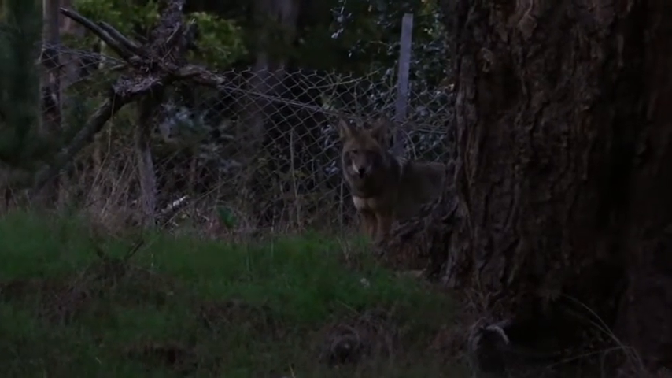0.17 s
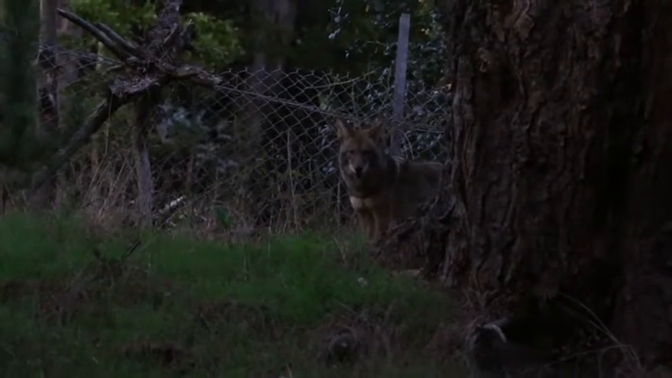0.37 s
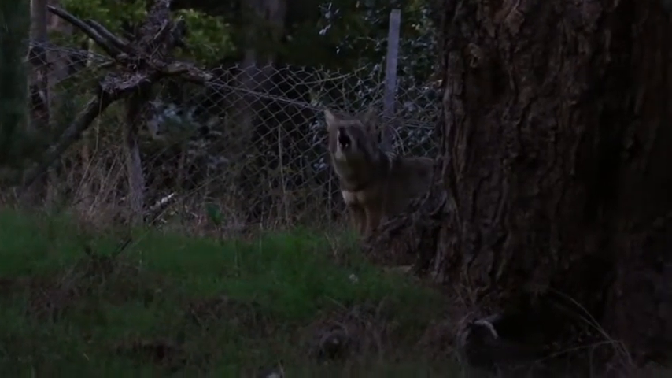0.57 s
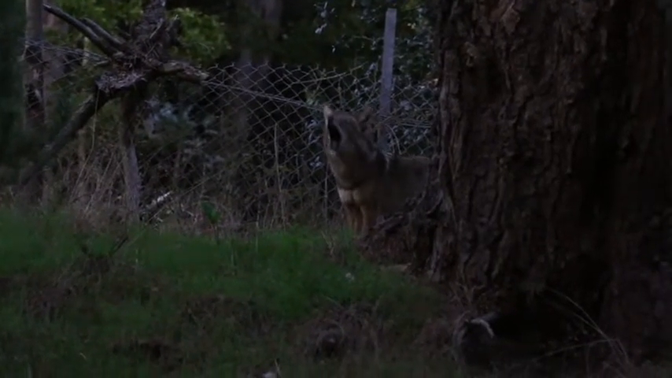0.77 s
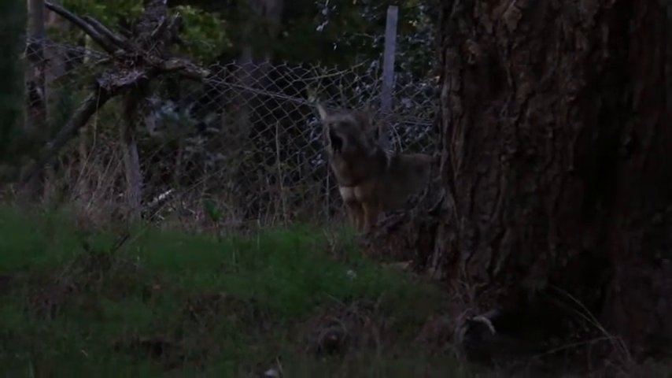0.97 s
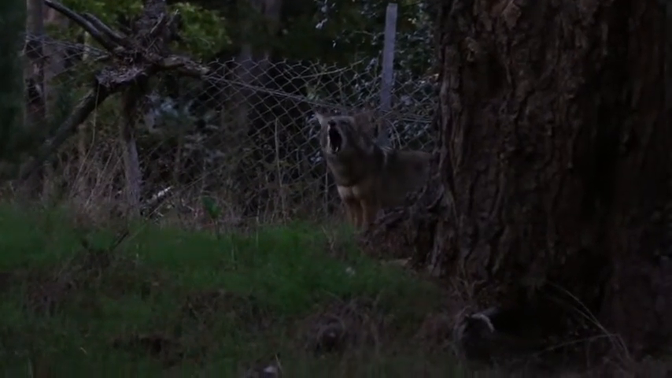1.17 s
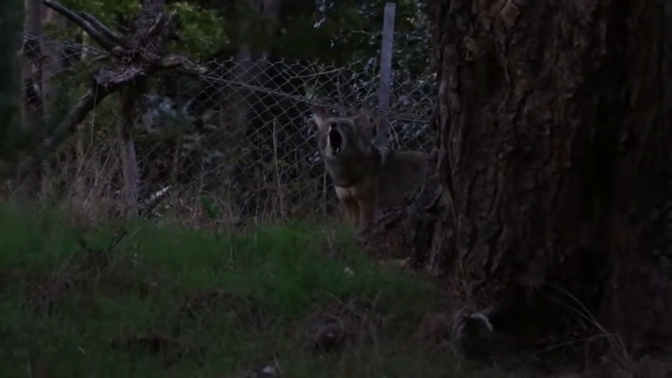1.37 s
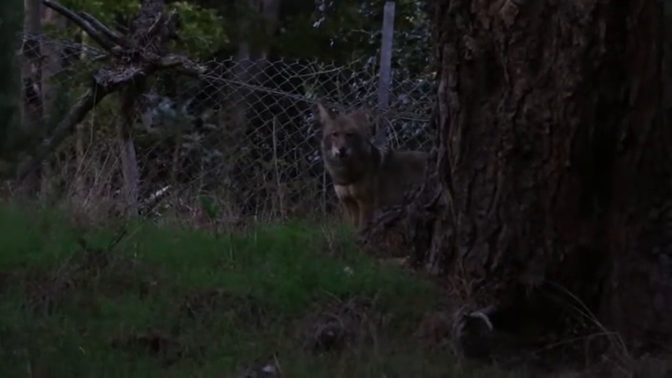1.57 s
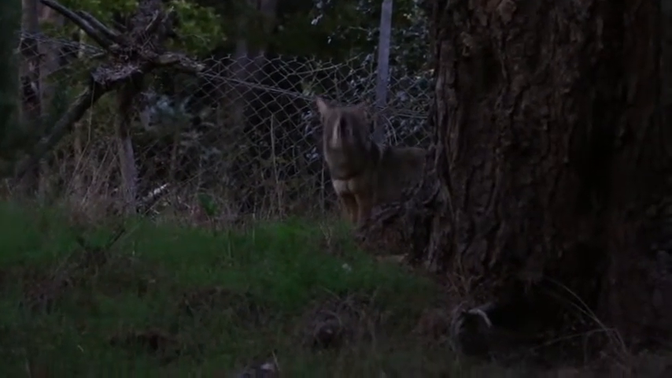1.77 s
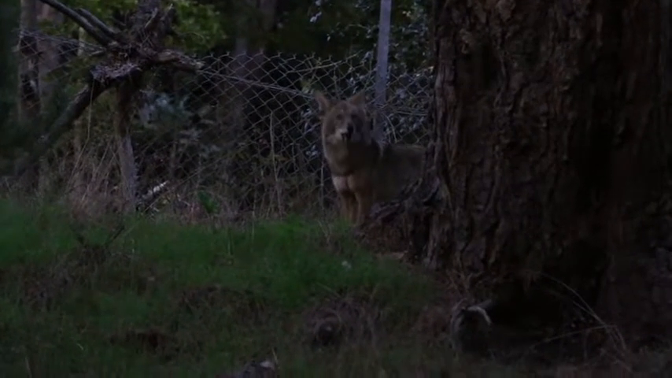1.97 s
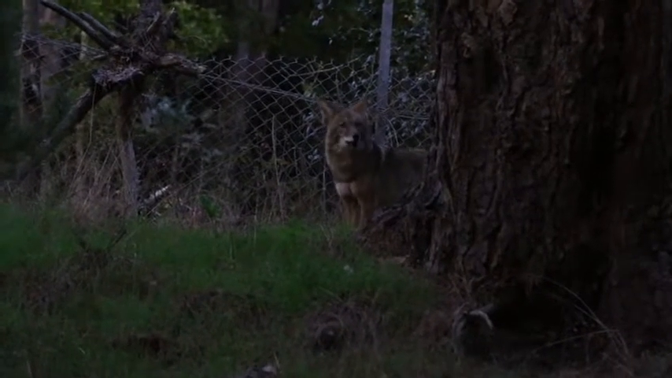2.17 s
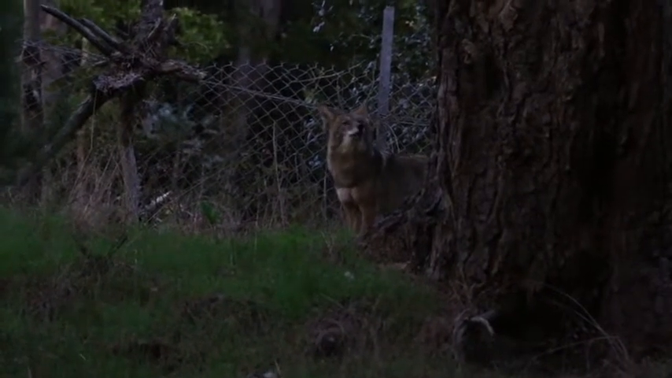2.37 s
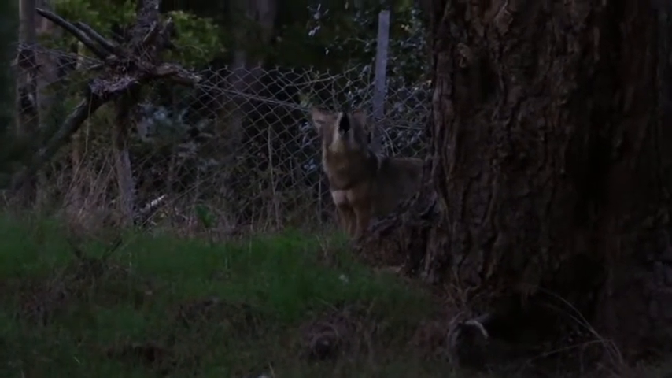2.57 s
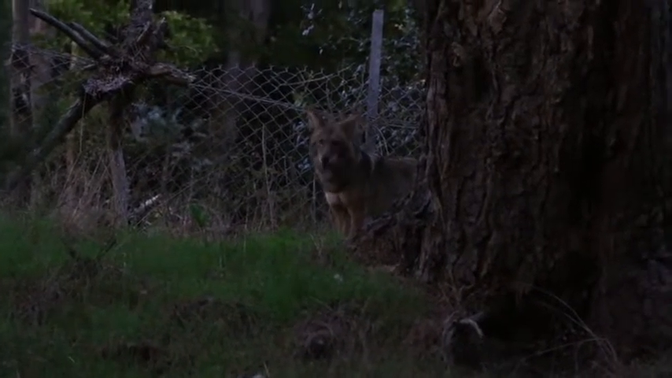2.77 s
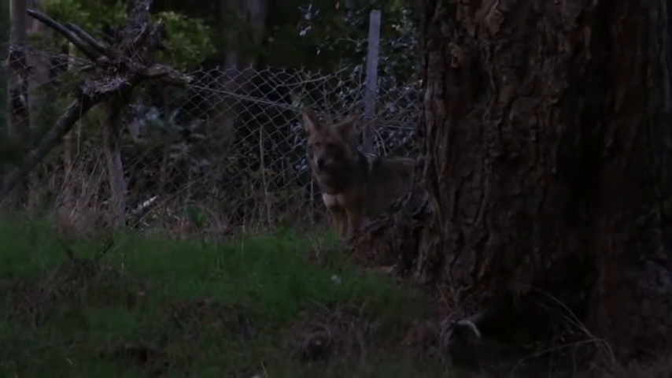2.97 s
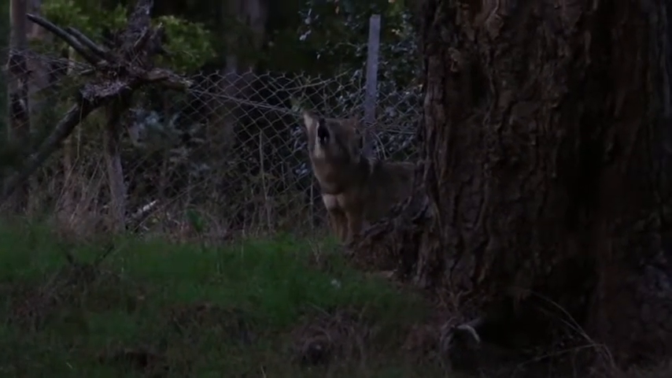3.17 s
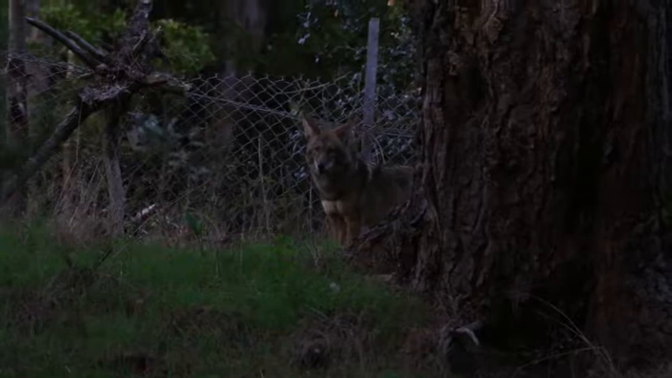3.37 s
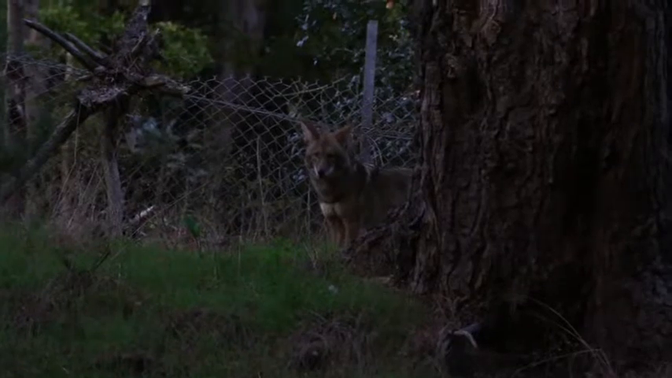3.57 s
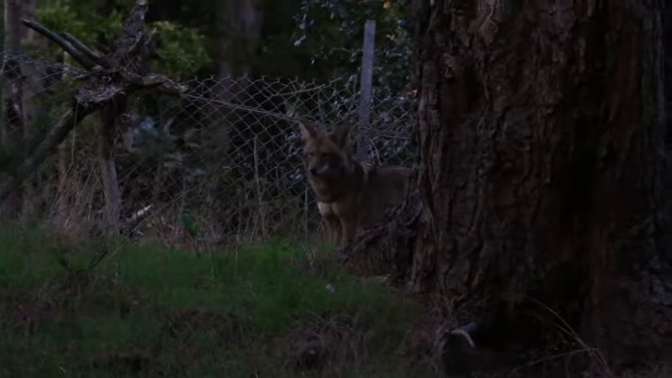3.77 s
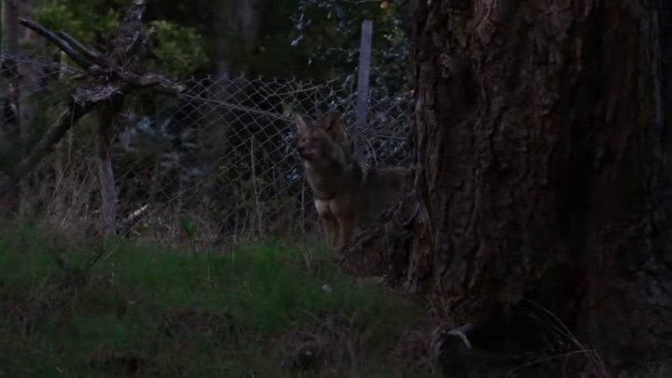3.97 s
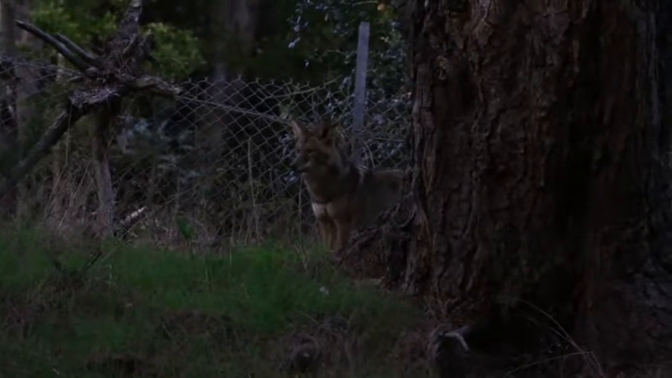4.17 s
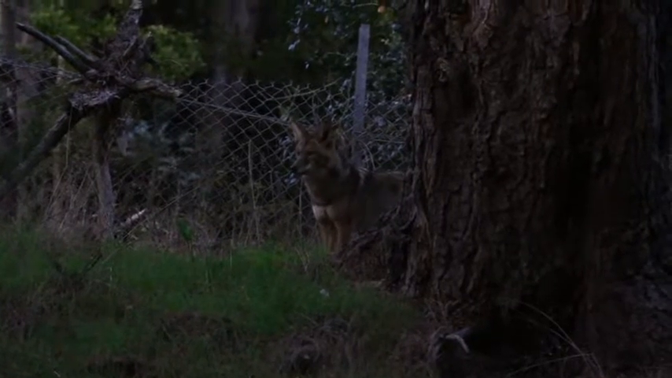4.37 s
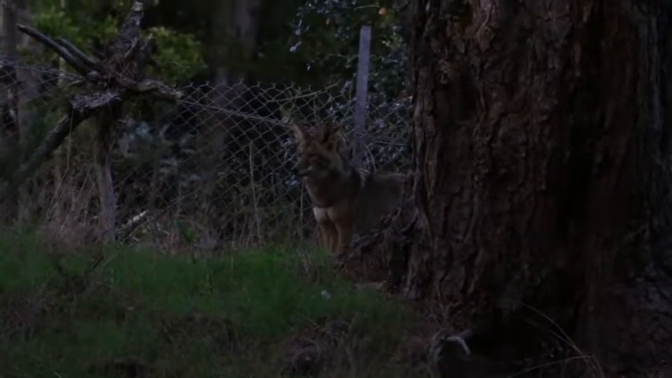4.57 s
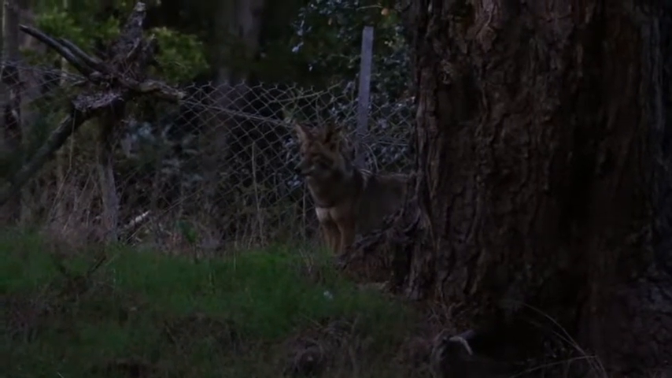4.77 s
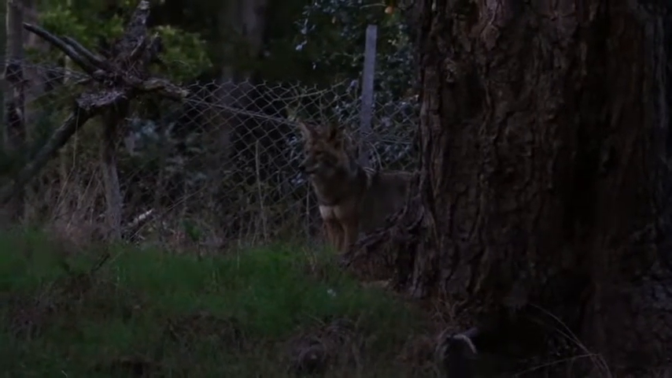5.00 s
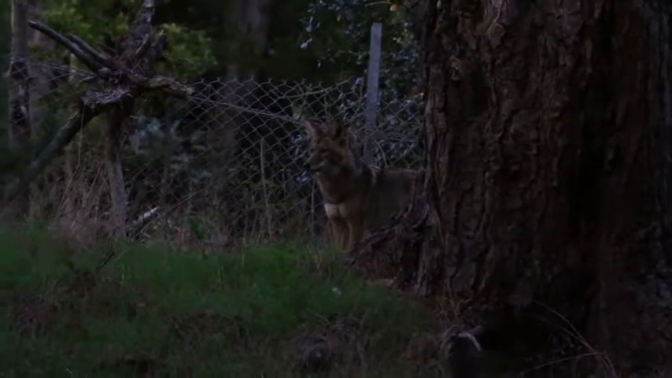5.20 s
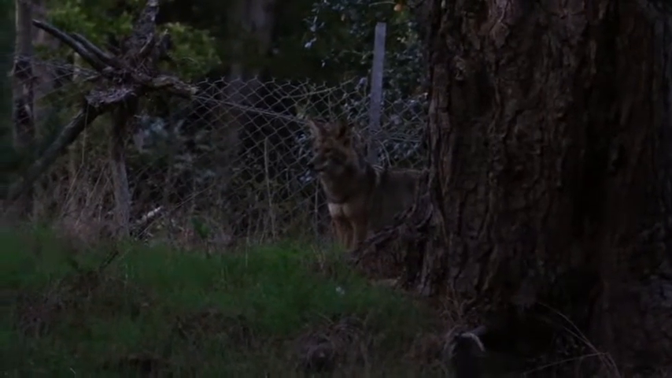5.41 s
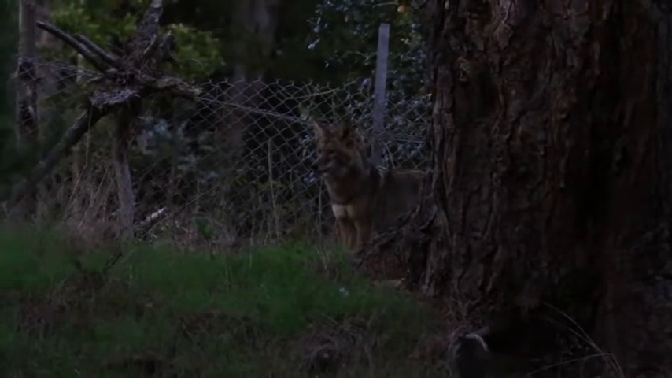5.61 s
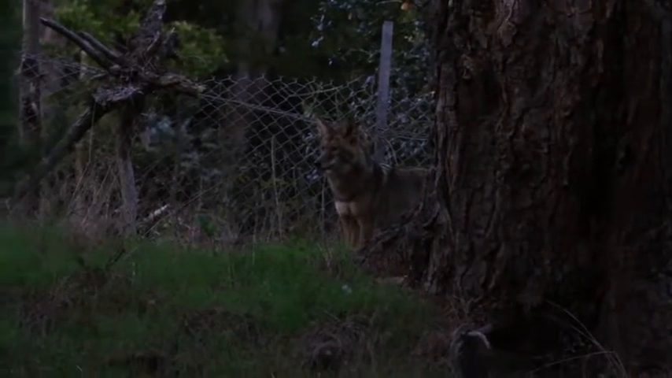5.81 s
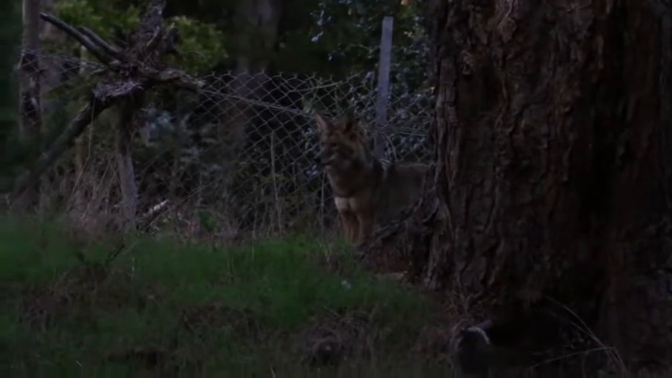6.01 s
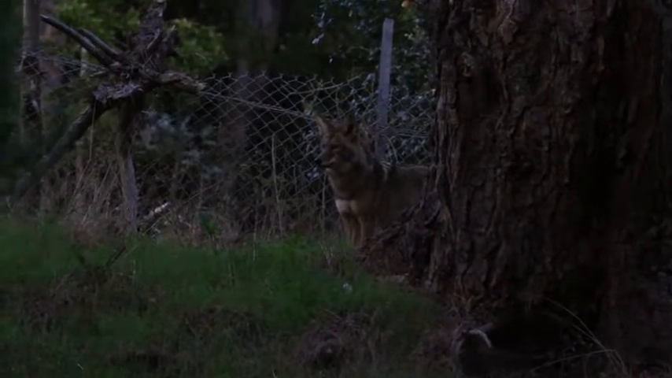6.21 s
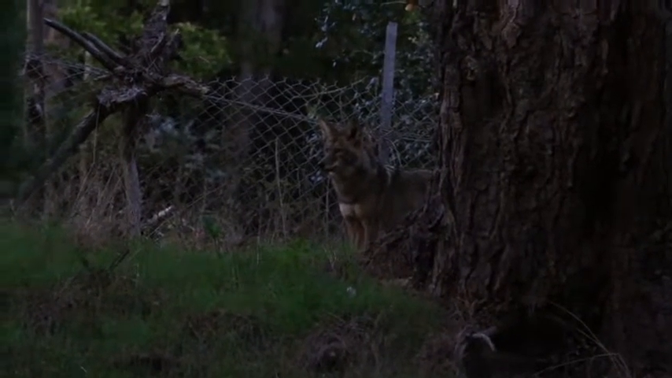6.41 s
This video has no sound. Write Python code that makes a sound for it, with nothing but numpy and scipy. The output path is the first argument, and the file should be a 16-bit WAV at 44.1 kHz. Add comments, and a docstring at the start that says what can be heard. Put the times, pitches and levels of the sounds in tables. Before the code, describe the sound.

A wooded outdoor place with a soft low rush, thin hiss and a barely audible low hum; at first the echo of an earlier yip is dying away. At 0.6 s a coyote yips loudly, pitch climbing into rasp and a tiny squeal. A second at 0.85 s breaks into a brighter squeal, and a third from 1.1 to 1.5 s is longest, rasping and squealing twice before dropping. Short harsh barks follow at 1.9, 2.6 and 3.2 s, the middle one with a brief squeal. Trunks and scattered woodland echo throw every call back. A far, dull dog barks near 2.3, 2.8, 3.6, 4.0 and 4.2 s. Faint bird chips and ticks come from 3.8 s to the end at about 6.4 s. Stereo, coyote slightly left; the background ducks after loud calls and slowly returns.

```python
"""Outdoors, over a low rush and a faint hum, the echo of an earlier coyote yip is dying away.
A coyote gives three yips, its bark breaking through rasp into squeal, then three harsh barks, one with a short
squeal. Trunks and scattered echoes throw each call back. From 2.3 s a far dog barks, and from 3.8 s birds chip.
Voices are sums of wavering harmonics; the rush is shaped noise, the hum a sine and the wood a stereo response.
After loud calls a limiter holds everything down and lets go slowly, so the background ducks too."""
import sys
import numpy as np
from scipy import signal
from scipy.fft import rfft, irfft, next_fast_len
from scipy.io import wavfile
from scipy.ndimage import uniform_filter1d, minimum_filter1d, map_coordinates

SR = 44100
rng = np.random.default_rng(int(sys.argv[2]) if len(sys.argv) > 2 else 0)


def unload_audio(sound):
    """Save the sound as a 16-bit wav file, at the path given as the first command line argument."""
    columns = np.transpose(np.atleast_2d(sound))
    # keep every value between -1 and 1, then stretch to whole-number steps
    steps = np.round(np.clip(columns, -1, 1) * 32767)
    wavfile.write(sys.argv[1], SR, steps.astype(np.int16))


N = 284445

# Outdoor rush, tone colour: f/Hz, relative level/dB
AIR_COLOUR = [(18, -22), (40, -5), (85, 0), (180, -2.5), (290, -.5), (350, -1.5), (700, -4.5), (1020, -5.5),
              (1300, -11), (1600, -18), (2000, -25), (2600, -31), (4000, -36), (9000, -40), (15500, -45)]
# Outdoor rush, loudness over time: t/s, level/dB
AIR_LOUDNESS = [(0, -39), (1.701, -40), (3.001, -35.5), (4.402, -39), (5.499, -39), (6.45, -38.5)]
# How alike left and right are in noise from all around: f/Hz, likeness/0-1
LEFT_RIGHT_LIKENESS = [(100, 1), (1000, 0.88), (2000, 0.34), (4000, 0.38), (12000, 0.5)]
# Hum, loudness over time: t/s, level/dB
HUM_LOUDNESS = [(0, -60), (2, -56), (3.3, -58), (4.2, -66), (6.45, -61)]
HUM_HZ = 175.4
# Small birds: t/s, length/s, start f/Hz, end f/Hz, level/dB, roughness/0-1
BIRD_CHIPS = [(3.814, 0.097, 6900, 6080, -62.5, 0.88), (4.362, .03, 2850, 2750, -65, .9),
              (4.472, 0.012, 4500, 4400, -65, 0.7), (4.678, 0.019, 4580, 4400, -68.5, 0.7),
              (4.703, 0.012, 4510, 4400, -67, 0.7), (5.417, 0.015, 4600, 4400, -67, .6),
              (5.534, 0.015, 4470, 4370, -65, .6), (6.135, 0.037, 5040, 4780, -61.5, 0.2),
              (6.34, 0.063, 8100, 8450, -70.5, .1)]
# Far dog: t/s, length/s, pitch at top of arch/Hz, level/dB, strongest resonance f/Hz
FAR_BARKS = [(2.272, 0.08, 396.4, -38.5, 776), (2.771, 0.057, 439, -33.5, 482),
             (3.643, 0.088, 377, -36, 744), (4.017, 0.072, 468, -40, 850), (4.035, .07, 465, -55, 1850),
             (4.077, 0.102, 527, -55, 2077), (4.246, 0.079, 430, -34, 730)]
# Echo of the wood, tone colour: f/Hz, relative level/dB
WOOD_TONE = [(200, -19), (700, -1), (1000, 6), (1400, 4.5), (2700, 0.5), (3400, 2.5), (5000, 1.5),
             (7500, -2), (15000, 0.5)]
# Echo of the wood, time to fall by 60 dB: f/Hz, t60/s
WOOD_FADING = [(300, 1.5), (750, 2.45), (1400, 1.57), (2700, 1.275), (4500, 0.86), (8000, 0.41),
               (15000, .22)]
# Echoes from groups of trunks: delay/s, level/dB, scatter/s
TRUNK_ECHOES = [(.004, -13.5, 0.0064), (.045, -15, 0.018), (.095, -21.5, 0.025), (.18, -24.5, 0.012)]
# Coyote calls, one row each, in four groups; overtone levels are relative to the lead tone:
#   climb: t/s, start pitch/Hz, top pitch/Hz, bend (higher = later), swell length/s, level/dB,
#          overtones/dB, roughness/0-1
#   rasp:  t/s, level/dB, overtones/dB
#   drop:  t/s, length/s, start pitch/Hz, level/dB, overtones/dB
#   head:  mouth at start, mouth at top (both factors on the resonances), treble/dB
COYOTE_CALLS = [((.61, 495, 715, 3.2, .078, -7, -5, .38), (.682, -20, 9), (.757, .052, 871, -9, -4),
                (.73, .93, -2)), ((.845, 540, 799.7, 2.8, .085, -8, 1, .58), (.941, -19.5, 6),
                (1.031, .038, 920, -12, -2), (.84, .96, -3)), ((1.105, 540, 841.7, 2.5, .08, -10, 1, .36),
                (1.195, -21, 8), (1.482, .045, 888.2, -7.5, -4), (.8, .97, 1)),
                ((1.859, 500, 766, 2.4, .05, -10.5, -2, .62), (1.938, -25, 12), (1.95, .042, 818.4, -13, 1),
                (.7, .96, 1)), ((2.6, 505, 705.5, 1.603, .038, -9, -4, .48), (2.674, -23, 9),
                (2.711, .024, 860, -17, -5), (.7, .93, -1)), ((3.18, 510, 795, 2.3, .052, -10, -3, .62),
                (3.28, -24, 6), (3.288, .032, 760, -11.5, -3), (.71, .99, 1))]
# Squeals an octave up, into which some rasps lock:
# start t/s, end t/s, start pitch/Hz, end pitch/Hz, arch height/Hz, level/dB, swell from start to end/dB,
# overtones/dB, roughness/0-1, purity/0-1 (share that has jumped the octave)
SQUEALS_IN_CALLS = [(0.719, .757, 1379, 1349, 15, -11.5, -5.5, 1, 0.04, 1),
                    (.943, 1.031, 1449, 1397, 150, -6.5, -6, -6, 0.41, 0.85),
                    (1.224, 1.32, 1460, 1318, 55, -13.5, 3, -1, .08, 0.98),
                    (1.368, 1.482, 1312, 1334, 118, -11, 4, -4.5, 0.01, 1),
                    (2.674, 2.71, 1344, 1300, 10, -13.5, -4, 1, 0.81, .88)]
# Throat resonances at mouth factor 1: f/Hz, relative level/dB
THROAT_COLOUR = [(380, -69.5), (750, -20), (1050, 6), (1450, -10.5), (1950, 3.5), (2720, 0), (3080, -15.5),
                 (4100, -26), (5200, -38), (7200, -30.5), (10500, -40), (15500, -52.5)]
# Narrow treble resonances of the muzzle: f/Hz, width/Hz, half-open boost/dB, wide-open boost/dB
MUZZLE_RESONANCES = [(4290, 300, 0, 4), (4860, 250, -11.5, -4.5), (5100, 440, 15, 3.5),
                     (5610, 185, -11, -4.5), (5820, 340, 6.5, 4.5), (6400, 250, 14, -0.5),
                     (7250, 450, -8, 10.5), (7800, 700, -12, 3.5), (8780, 550, 8.5, 5),
                     (11800, 2200, -3, -4.5)]

# climb: a soft start swells; the lead tone is weak while the pitch is low
SOFT_DB, SWELL_CURVE = -20, 1.36
LOW_TONE_DB, LOW_TONE_CURVE = -7, 4
# rasp: the lead tone collapses and leaves chaotic overtones
RASP_PITCH_SHARE, RASP_ROUGH, RASP_SQUEAL = .94, .8, .28
RASP_MOUTH_SHARE, RASP_FADE_DB_PER_S = .98, 20
# squeal: a flat-topped arch, weaker but brighter at both ends
ARCH_FLATNESS, SQUEAL_ENDS_DB, SQUEAL_ENDS_OVERTONES_DB = 2.58, -5.5, 3.5
OPEN_MOUTH_HZ = 1321  # the mouth follows the squeal; its factor is 1 at this pitch
# drop: the tone returns, glides down and fades while the mouth closes
END_HZ, DROP_FADE_DB, DROP_CURVE, DROP_BRIGHTENS_DB = 570, -27, 1.7, 8
DROP_ROUGH, DROP_MOUTH, END_MOUTH = .45, .95, .88
SNAP_S = 0.0068  # time the voice takes to change register
TREBLE_HZ = 4500  # above this the voice is beamed where the head points
EDGE_HZ = 15720  # treble limit of the whole scene


def amp(db):
    """Turns decibels into gain."""
    return 10 ** (np.asarray(db) / 20)


def unit(x):
    """Scales a sound to an average (rms) strength of 1."""
    return x / np.sqrt(np.mean(x ** 2) + 1e-20)


def read(points, hz):
    """Reads a curve between its points on a log-frequency axis."""
    f, value = np.transpose(points)
    return np.interp(np.log(hz + 1), np.log(f + 1), value)


def over_time(points):
    """Reads a curve for every sample of the scene."""
    return np.interp(np.arange(N) / SR, *np.transpose(points))


def add(mix, s, sound):
    """Mixes a sound in at time s."""
    part = mix[max(round(s * SR), 0):][:len(sound)]
    part += sound[:len(part)]


def progress(t, start, length):
    """Runs from 0 to 1 over a stretch of time."""
    return np.clip((t - start) / length, 0, 1)


def glide(a, b, share):
    """Goes from a to b as the share goes from 0 to 1."""
    return a + (b - a) * share


def sine_phase(hz):
    """Adds up a changing pitch into the phase of a wave."""
    return 2 * np.pi * np.cumsum(hz) / SR


def wander(n, rate_hz):
    """Makes smooth random motion, mostly slower than the given rate."""
    size = next_fast_len(n)
    hz = np.fft.rfftfreq(size, 1 / SR)
    slow = rfft(rng.standard_normal(size)) / (1 + (hz / rate_hz) ** 4)
    return unit(irfft(slow, size))[:n]


def coloured(n, spectrum):
    """Makes noise with the given tone colour."""
    hz = np.fft.rfftfreq(n, 1 / SR)
    return unit(irfft(rfft(rng.standard_normal(n)) * amp(read(spectrum, hz)), n))


def stereo_noise(n, spectrum):
    """Noise from all around at two close pickups: alike in the bass, less so in the treble."""
    hz = np.fft.rfftfreq(n, 1 / SR)
    common, apart = rfft(rng.standard_normal((2, n))) * amp(read(spectrum, hz))
    same = np.clip(read(LEFT_RIGHT_LIKENESS, hz), 0, 1)
    mid = irfft(common * np.sqrt((1 + same) / 2), n)
    side = irfft(apart * np.sqrt((1 - same) / 2), n)
    return np.array([mid + side, mid - side])


def air():
    """Low rush of far traffic and trees, with thin hiss above it: shaped noise."""
    rush = unit(stereo_noise(next_fast_len(N), AIR_COLOUR)[:, :N])
    return rush * amp(over_time(AIR_LOUDNESS))


def hum(waver=0.0046):
    """Distant machinery: a faint sine whose pitch wavers slowly."""
    phase = sine_phase(HUM_HZ * (1 + waver * wander(N, 2.2)))
    return unit(np.sin(phase)) * amp(over_time(HUM_LOUDNESS))


def birds(spread_hz=300):
    """Thin chips and ticks: short gliding sines, the rough ones with a shaky pitch."""
    out = np.zeros(N)
    for s, length, start_hz, end_hz, db, rough in BIRD_CHIPS:
        n = round(length * SR)
        hz = np.linspace(start_hz, end_hz, n) + spread_hz * rough * wander(n, 500)
        chip = unit(np.sin(sine_phase(hz)) * np.hanning(n))
        add(out, s, amp(db) * chip)
    return out


def far_dog(width_hz=230, jitter=0.053, arch=0.051):
    """Short barks with arched pitch, dulled by distance to harmonics around one resonance."""
    out = np.zeros(N)
    for s, length, pitch, db, peak_hz in FAR_BARKS:
        n = round(length * SR)
        shape = signal.windows.tukey(n, .6)
        phase = sine_phase(pitch * (1 + arch * (shape - 1) + jitter * wander(n, 300)))
        bark = np.zeros(n)
        for k in range(1, 6):
            off_peak = (k * pitch - peak_hz) / width_hz
            bark += np.cos(k * phase) / (1 + off_peak ** 2) ** 1.08
        add(out, s, amp(db) * unit(bark) * shape)
    return out


def wood(tail_db=-17, build_s=0.022):
    """Stereo response of the wood: a few trunk echoes and a long scatter that loses its treble."""
    size = 2 * SR
    hz, age, noise = signal.stft(stereo_noise(size, WOOD_TONE), SR, nperseg=256)
    t60 = read(WOOD_FADING, hz)[:, None]
    tail = amp(tail_db - 60 * age / t60) * (1 - np.exp(-age / build_s))
    power = tail ** 2 * 2 * np.log(1000) / SR
    for delay, db, scatter in TRUNK_ECHOES:
        burst = (age >= delay) * np.exp(-abs(age - delay) / scatter)
        power = power + amp(db) ** 2 * burst / (burst.sum() * age[1] * SR)
    return signal.istft(noise * np.sqrt(power), SR, nperseg=256)[1][:, :size]


def echo(x, response):
    """Sends a mono sound through a stereo response."""
    return signal.fftconvolve(x[None], response, axes=1)[:, :N]


def dying_echo(response, skip_s=1.768, level_db=-1):
    """The wood still rings with a yip given just before the scene opens."""
    long_yip = coyote(COYOTE_CALLS[2:3])
    # skip the call itself, so that only the end of its echo is left
    ring = echo(long_yip, response)[:, round(skip_s * SR):]
    return amp(level_db) * np.pad(ring, ((0, 0), (0, N - ring.shape[1])))


# Each stage gives: pitch Hz, lead tone dB, overtones above it dB, roughness, squeal share, mouth factor.
def climbing(t, end, first_mouth, mouth, start, start_hz, top_hz, bend, swell_s, db, over_db, rough):
    """The bark swells as its pitch rises and the mouth opens; while low, the lead tone is weak."""
    rise = np.sin(np.pi / 2 * progress(t, start, end - start)) ** bend
    soft_db = SOFT_DB * (1 - progress(t, start, swell_s)) ** SWELL_CURVE
    weak_db = LOW_TONE_DB * (1 - rise) ** LOW_TONE_CURVE
    return (glide(start_hz, top_hz, rise), db + soft_db + weak_db, over_db - weak_db,
            rough, 0, glide(first_mouth, mouth, rise))


def rasping(t, top_hz, mouth, start, db, over_db):
    """Pushed past its top pitch the voice turns chaotic and slowly weakens."""
    return (RASP_PITCH_SHARE * top_hz, db - RASP_FADE_DB_PER_S * (t - start), over_db,
            RASP_ROUGH, RASP_SQUEAL, RASP_MOUTH_SHARE * mouth)


def squealing(t, start, end, start_hz, end_hz, arch_hz, db, swell_db, over_db, rough, purity):
    """The voice jumps an octave; pitch, level and mouth follow one flat-topped arch."""
    along = progress(t, start, end - start)
    ends = abs(2 * along - 1) ** ARCH_FLATNESS  # 1 at both ends, 0 in the middle
    hz = glide(start_hz, end_hz, along) + arch_hz * (1 - ends)
    level_db = db + swell_db * (along - .5) + SQUEAL_ENDS_DB * ends
    # half the pitch heard, because the octave jump doubles it again
    return (hz / 2, level_db, over_db + SQUEAL_ENDS_OVERTONES_DB * ends,
            rough, purity, hz / OPEN_MOUTH_HZ)


def dropping(t, start, length, hz, db, over_db):
    """The low voice returns, slides down and dies."""
    along = progress(t, start, length)
    return (glide(hz, END_HZ, along), db + DROP_FADE_DB * along ** DROP_CURVE,
            over_db + DROP_BRIGHTENS_DB * along, DROP_ROUGH, 0, glide(DROP_MOUTH, END_MOUTH, along))


def controls(bark):
    """Snaps the voice from stage to stage: climb, rasp, any squeals with rasp after them, drop."""
    climb, rasp, drop, (first_mouth, mouth, _) = bark
    start, _, top_hz, *_ = climb
    t = np.arange(start, drop[0] + drop[1], 1 / SR)
    chaos = rasping(t, top_hz, mouth, *rasp)
    stages = [(rasp[0], chaos)]
    for squeal in SQUEALS_IN_CALLS:
        if start < squeal[0] < drop[0]:
            stages += [(squeal[0], squealing(t, *squeal)), (squeal[1], chaos)]
    stages.append((drop[0], dropping(t, *drop)))
    voice = climbing(t, rasp[0], first_mouth, mouth, *climb)
    for s, stage in stages:
        snap = progress(t, s - SNAP_S / 2, SNAP_S)
        voice = [glide(old, new, snap) for old, new in zip(voice, stage)]
    return voice


def muzzle(x, mouth, half_open=.78, wide_open=.87):
    """Treble resonances take turns as the jaw drops."""
    size = next_fast_len(len(x) + 1000)
    f = np.fft.rfftfreq(size, 1 / SR)
    colour_db = np.zeros((2, len(f)))
    for hz, width, half_db, wide_db in MUZZLE_RESONANCES:
        colour_db += np.array([[half_db], [wide_db]]) / (1 + (2 * (f - hz) / width) ** 2)
    half, wide = irfft(rfft(x, size) * amp(colour_db), size)[:, :len(x)]
    return glide(half, wide, progress(mouth, half_open, wide_open - half_open))


def call(bark, flutter=0.0023, jitter=0.023, jitter_hz=170, shimmer=0.35, smear=1.25, smear_hz=115,
         breath=.33, grain_db=3.0, surge_db=1.5, flicker_db=4):
    """Vocal folds that run clean, period-doubled or chaotic, through a mouth that opens and shuts."""
    hz, lead_db, over_db, rough, squeal, mouth = controls(bark)
    n = len(hz)
    rough, squeal = np.clip(rough, 0, 1), np.clip(squeal, 0, 1)
    shake = (flutter + jitter * np.sqrt(rough)) * wander(n, jitter_hz)
    phase = sine_phase(hz * (1 + shake))

    # in a squeal the odd harmonics vanish and the voice sounds an octave up
    odd = np.sqrt(1 - squeal)
    lead = (odd * np.cos(phase) + np.sqrt(squeal) * np.cos(2 * phase)) * np.sqrt(2)
    lead *= 1 + shimmer * rough * wander(n, 230)

    overtones, power = np.zeros(n), np.zeros(n)
    for k in np.arange(1.5, 23, .5):
        if k % 1:
            share = rough * odd  # period doubling puts lines between the harmonics
        elif k % 2 or k == 2:
            share = odd
        else:
            share = 1
        weight = share * amp(read(THROAT_COLOUR, k * hz / mouth))
        flicker = amp(flicker_db * rough * wander(n, 80))  # each line comes and goes on its own
        stray = smear * rough * np.sqrt(k / np.pi) * wander(n, smear_hz)  # chaos makes it stray
        overtones += weight * flicker * np.cos(k * phase + stray + 2 * np.pi * rng.random())
        power += weight ** 2 / 2

    # turbulence, puffed out once a cycle; reading the noise at mouth speed moves its resonances
    noise = coloured(next_fast_len(2 * n), THROAT_COLOUR)
    puffs = map_coordinates(noise, [np.cumsum(mouth)], order=3, mode="wrap")
    puffs = unit(puffs * (1 + .5 * np.cos(phase)))
    noisy = np.clip(breath * rough, 0, 1)
    upper = np.sqrt(1 - noisy ** 2) * overtones / np.sqrt(power) + noisy * puffs
    upper *= amp(grain_db * rough * (wander(n, 220) + 0.6))  # uneven cycles make the rasp coarse
    upper *= amp(surge_db * rough * wander(n, 60))  # it also comes in slower surges
    voice = amp(lead_db) * (lead + amp(over_db) * upper)
    return muzzle(voice * signal.windows.tukey(n, 2 * SNAP_S * SR / n), mouth)


def coyote(barks):
    """The yips and barks in turn, brighter or duller as the head turns."""
    out = np.zeros(N)
    high_pass = signal.butter(4, TREBLE_HZ, "high", fs=SR, output="sos")
    for bark in barks:
        climb, _, _, (_, _, treble_db) = bark
        voice = call(bark)
        treble = signal.sosfiltfilt(high_pass, voice)
        add(out, climb[0], voice + (amp(treble_db) - 1) * treble)
    return out


def ports(x, lag_s=1.1e-5):
    """A sound from slightly left reaches the right pickup a moment later."""
    size = next_fast_len(N)
    delay = np.exp(-2j * np.pi * np.fft.rfftfreq(size, 1 / SR) * lag_s)
    late = irfft(rfft(x, size) * delay, size)[:N]
    return np.array([x, late])


def scene(left_db=0.34, far_wet_db=3):
    """Background, far animals with extra echo and the near voice, all a little stronger on the left."""
    response = wood()
    background = air() + hum()
    far = birds() + far_dog()
    near = coyote(COYOTE_CALLS)
    wet = echo(near + amp(far_wet_db) * far, response) + dying_echo(response)
    return (ports(near + far) + wet + background) * amp([[left_db], [-left_db]])


def record(dry, threshold_db=-13, fall_db_per_s=8.0, strength=0.88):
    """A limiter that clamps quickly and lets go slowly, a guard against single peaks, then the band limit."""
    power_db = 10 * np.log10(abs(uniform_filter1d((dry ** 2).mean(0), size=350)) + 1e-12)
    # hold each peak of the level, sinking steadily until the sound rises above it
    fall = np.arange(N) * fall_db_per_s / SR
    held_db = np.maximum.accumulate(power_db + fall) - fall
    over_db = np.maximum(held_db - threshold_db, 0)
    limited = dry * amp(-strength * uniform_filter1d(over_db, size=200))
    headroom = np.minimum(.8 / (abs(limited).max(0) + 1e-9), 1)
    limited = limited * uniform_filter1d(minimum_filter1d(headroom, size=130), size=130)
    low_pass = signal.firwin(511, EDGE_HZ, window=("kaiser", 9), fs=SR)
    return signal.oaconvolve(limited, low_pass[None], "same")


dry = scene()
out = record(dry)
unload_audio(out)
```